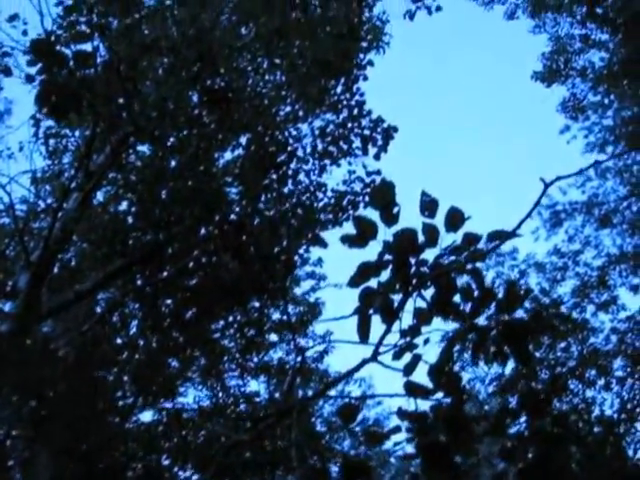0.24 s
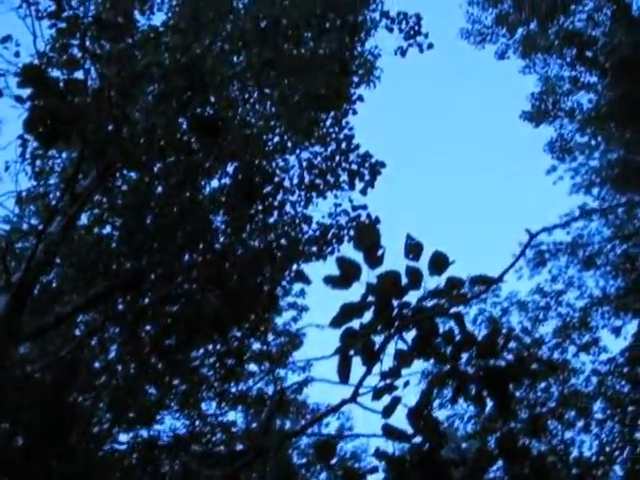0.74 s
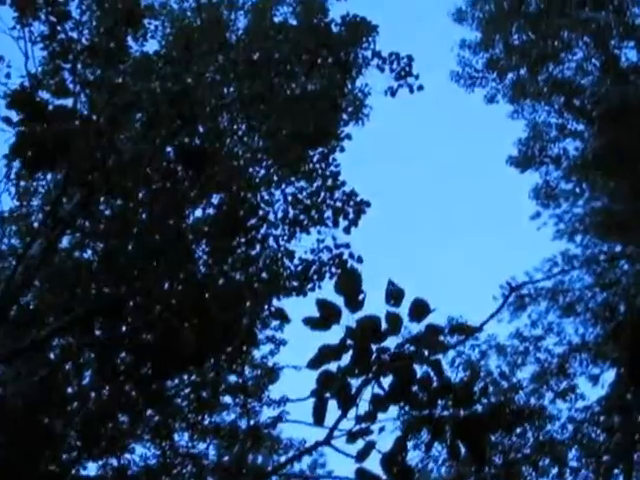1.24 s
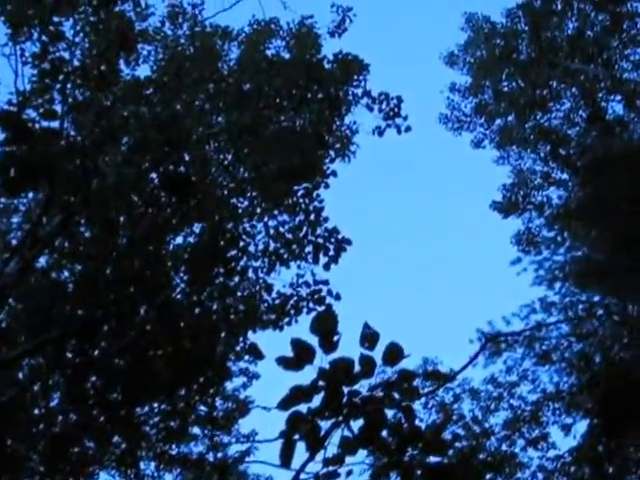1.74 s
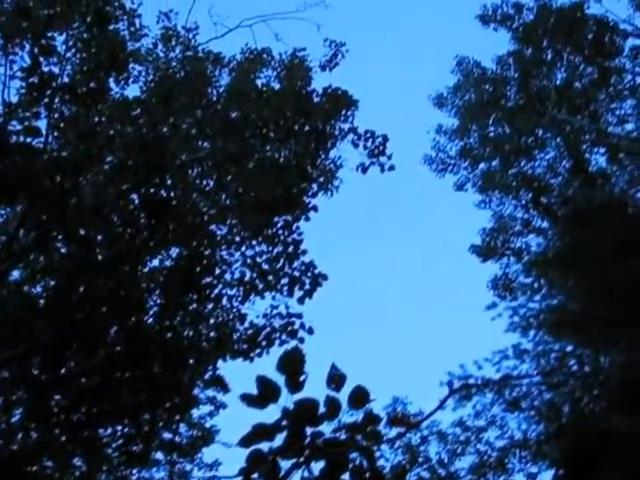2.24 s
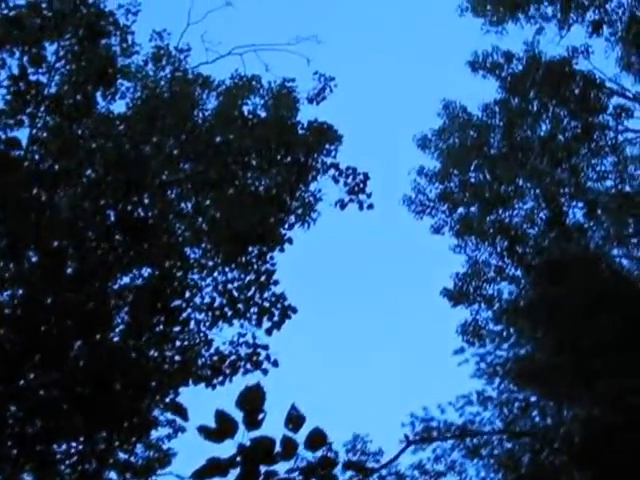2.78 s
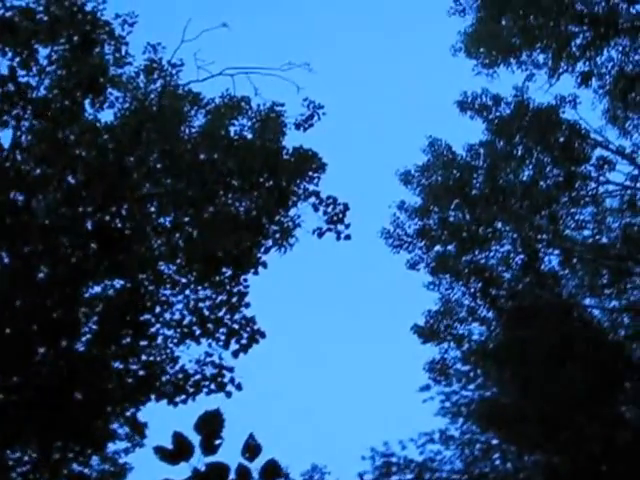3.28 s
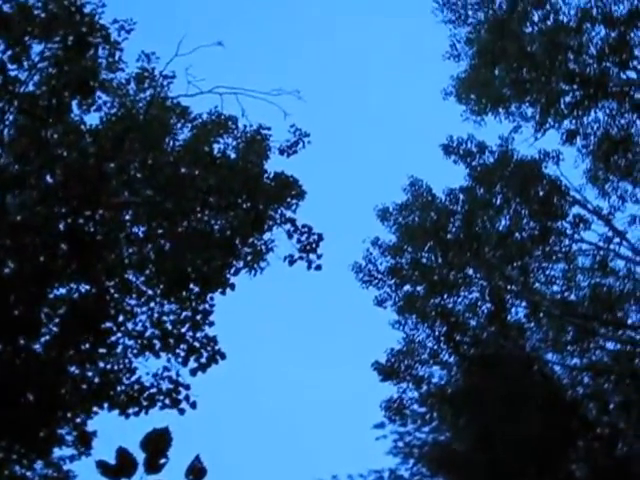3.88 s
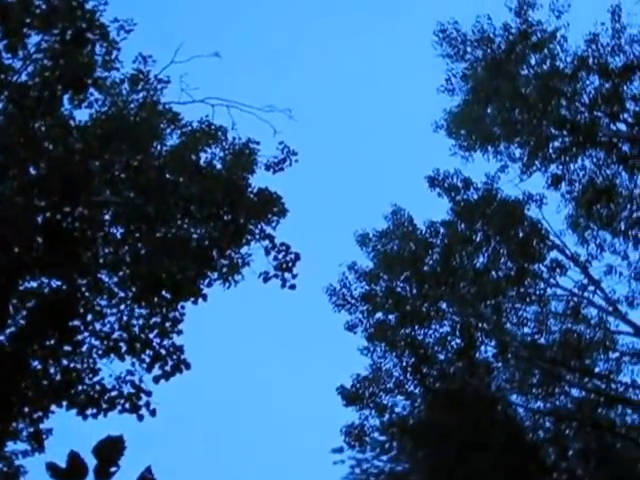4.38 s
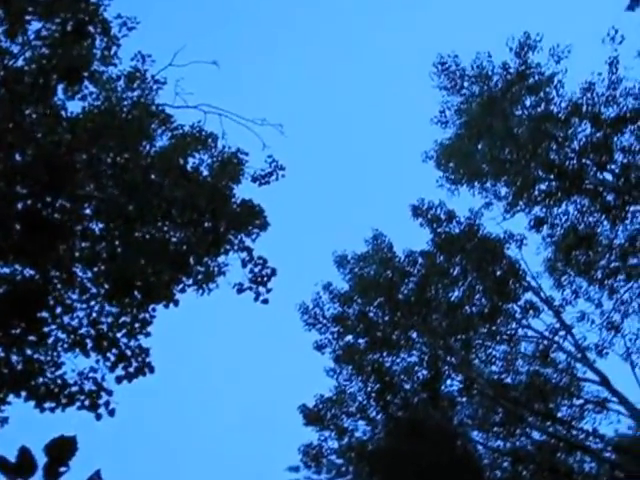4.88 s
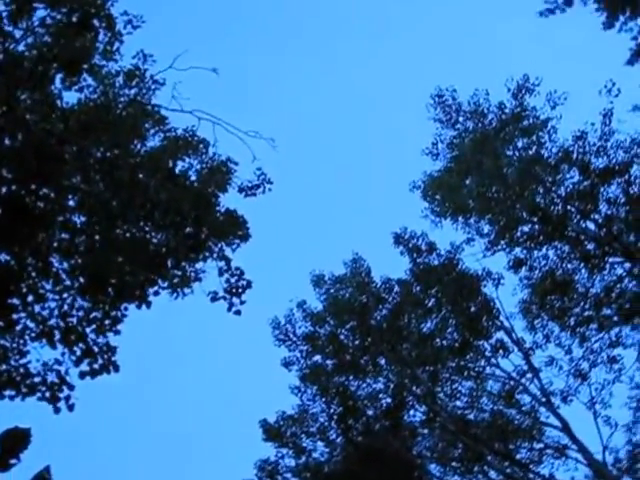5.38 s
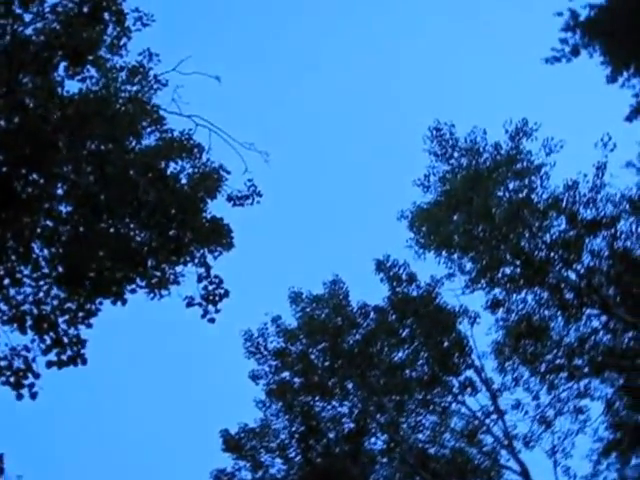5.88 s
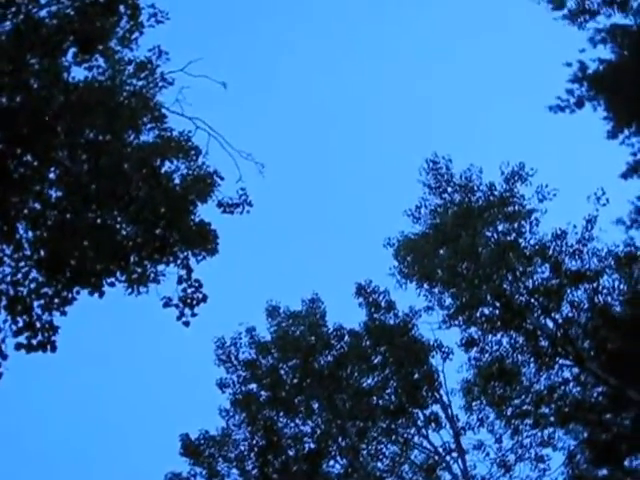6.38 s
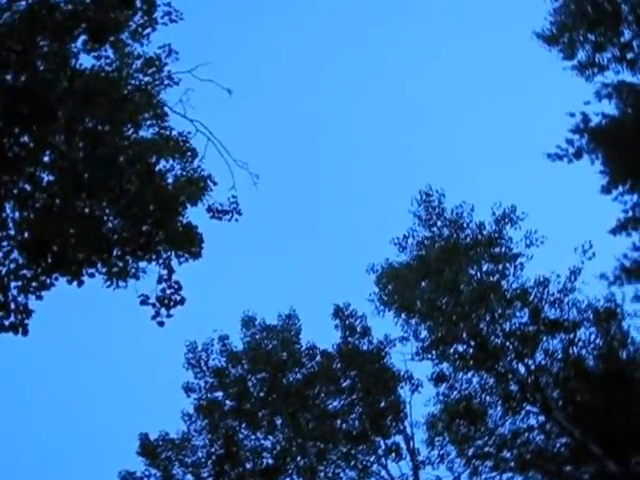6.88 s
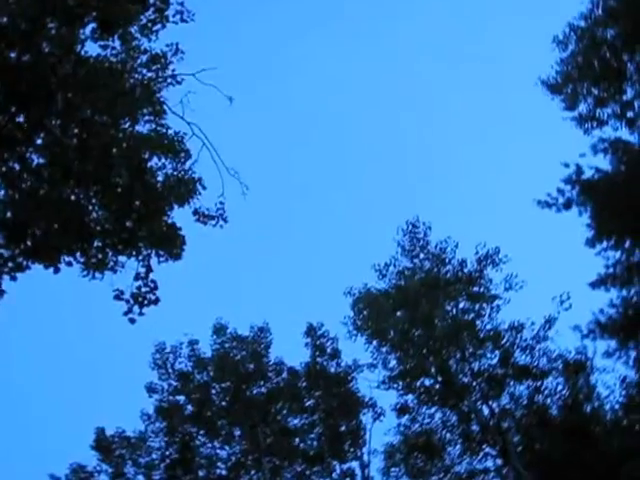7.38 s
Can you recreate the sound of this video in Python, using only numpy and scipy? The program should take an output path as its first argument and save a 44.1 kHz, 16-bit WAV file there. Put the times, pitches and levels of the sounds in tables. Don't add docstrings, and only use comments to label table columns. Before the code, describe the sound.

A forest at dawn, heard through a hand-held stereo microphone for about 7.6 seconds. Two flycatchers give split-second upward sweeps, each followed by a short buzz: the softer bird on the left at 0.1, 0.9, 1.7, 3.7, 4.5, 5.4 and 7.4, the nearer, louder one at 0.4, 1.2, 2.1, 2.7, 3.3, 4.4, 5.0, 6.3 and 6.9. From 0.4 to 3.5 a sparrow holds thin wavering whistles, high, then middle, then low. Short warbler slurs cluster around 4, 5, 6.1 and 7.1. Tree trunks spread everything into a bright echoing haze of far chorus. Low wind thumps shift between sides, with heavier gusts near 4.6, 5.8 and 7. Fingers rustle around 1.6 and 6.5; small ticks fall at 0.2, 0.5, 3.4 and 6.6, and faint motor steps patter ten per second from 1.8 to 2.8, over soft hiss and faint whine.

```python
import sys
import numpy as np
from scipy import signal
from scipy.fft import rfft, irfft
from scipy.io import wavfile
from scipy.ndimage import uniform_filter1d, map_coordinates

SR = 44100
rng = np.random.default_rng(int(sys.argv[2]) if len(sys.argv) > 2 else 0)


def convert_level_to_amplitude(level_db):
    exponent = np.asarray(level_db, float) / 20
    return 10 ** exponent


def wav_out(sig):
    wavfile.write(sys.argv[1], SR, np.round(np.clip(np.atleast_2d(sig).T, -1, 1) * 32767).astype(np.int16))


N = 336483
TIME = np.arange(N) / SR


def coloured(table, count=2):
    hz, db = np.transpose(table)
    f = np.maximum(np.fft.rfftfreq(N, 1 / SR), 1)
    gain = convert_level_to_amplitude(np.interp(np.log(f), np.log(hz), db))
    x = irfft(rfft(rng.standard_normal((count, N))) * gain, N)
    return x / np.std(x)


def narrow(hz, width_hz):
    x = signal.lfilter(*signal.iirpeak(hz, hz / width_hz, SR), rng.standard_normal(N))
    return x / np.std(x)


def walk(rate_hz):
    k = int(SR / rate_hz)
    return 1.37 * uniform_filter1d(np.repeat(rng.standard_normal(N // k + 1), k), k)[:N]


def bumps(times, sizes, width_s):
    return sum(size * np.exp(-.5 * ((TIME - at) / width_s) ** 2) for at, size in zip(times, sizes))


def add(track, start_s, sound):
    i = max(int(start_s * SR), 0)
    track[..., i:i + sound.shape[-1]] += sound[..., :N - i]


def sides(pan_db):
    return convert_level_to_amplitude(np.array([pan_db, -pan_db]) / 2).reshape(2, -1)


def whistle(hz, octave_db=-40):
    phase = 2 * np.pi * np.cumsum(hz) / SR
    third = .6 * (hz < 6200) * np.sin(3 * phase)
    return np.sqrt(2) * (np.sin(phase) + convert_level_to_amplitude(octave_db) * (np.sin(2 * phase) + third))


def slur(pitch):
    t = np.arange(pitch[0][0], pitch[-1][0], 1 / SR)
    hz = uniform_filter1d(np.interp(t, *np.transpose(pitch)), size=200, mode="nearest")
    return whistle(hz) * signal.windows.tukey(len(t), .35)


# pitch_hz, time_to_fall_60_db_s
TRUNK_RINGING = [(2200, 1.4), (3100, 1.23), (4400, 1.26), (6200, 0.89), (8800, 0.48), (12400, 0.47)]


def trunks(x, db, clump_db, early_db):
    t = TIME[:int(1.6 * SR)]
    echo = 0
    for hz, t60 in TRUNK_RINGING:
        band = signal.butter(2, [hz / 2 ** .25, hz * 2 ** .25], "bandpass", fs=SR, output="sos")
        echo = echo + signal.sosfilt(band, rng.standard_normal((2, len(t)))) * convert_level_to_amplitude(-60 * t / t60)
    clumps_db = clump_db * walk(500)[:len(t)] * np.exp(-t / 0.014)
    nearest_db = early_db * np.exp(-t / 0.089)
    build = (1 - np.exp(-t / .005)) ** 2
    echo = echo * convert_level_to_amplitude(clumps_db + nearest_db) * build * convert_level_to_amplitude(db) / np.sqrt(0.014 * SR)
    return signal.fftconvolve(np.atleast_2d(x), echo, axes=1)[:, :N]


# time_s, level_db, left_minus_right_db
BREEZE = [(0, -68, -16), (.33, -67.5, -26), (.8, -58.5, -12), (1.5, -52, -5), (2.3, -54.5, -5),
          (2.85, -49.5, -0.5), (3.4, -54.5, -4), (3.7, -62, 38), (4.0, -50, 27), (4.5, -56, 23),
          (5.3, -47.5, 17), (5.95, -49.5, 31), (6.3, -56.5, 1), (6.6, -62, 13), (6.85, -54.5, -33),
          (7.2, -55.5, -12), (7.63, -55, -7)]
# time_s, gain_db
GUSTS = [(.15, 9), (.58, 11.5), (1.24, 5.5), (3.62, 8), (4.06, 5), (4.62, 11), (4.99, 3.5), (5.09, 3),
         (5.45, 7), (5.72, 14), (5.87, 15.5), (6.04, 9), (6.17, 5.5), (6.991, 14.5), (7.16, 8.5)]
# pitch_hz, level_db (per Hz)
THUMP_TONE = [(12, -50), (22, -12), (50, 1.5), (75, 4), (115, -0.5), (170, -11), (260, -22), (400, -45),
              (800, -53)]
# pitch_hz, level_db (per Hz)
FLUTTER_TONE = [(40, -12), (100, 4), (150, 0.5), (250, -14), (400, -22), (800, -53)]


def wind():
    s, db, pan_db = np.transpose(BREEZE)
    pan_db = np.interp(TIME, s, pan_db)
    louder_db = 20 * np.log10(2 / np.hypot(*sides(pan_db)))
    force_db = np.interp(TIME, s, db) + np.array([walk(11), walk(12)])
    force_db = force_db + bumps(*np.transpose(GUSTS), width_s=0.039)
    flutter_db = 0.5 * (force_db + 44.5) - 8.5 + 3.0 * walk(25)
    eddies = coloured(THUMP_TONE) + coloured(FLUTTER_TONE) * convert_level_to_amplitude(flutter_db)
    return eddies * sides(pan_db) * convert_level_to_amplitude(force_db + louder_db - 2.5)


# pitch_hz, level_db (per Hz)
AIR_TONE = [(30, -15), (80, -18.5), (160, -39), (280, -21.5), (575, -25.5), (810, -23.5), (1000, -61),
            (1300, -25), (1700, -20), (2600, -18.5), (5000, -63), (7500, -26.5), (12500, -34.5),
            (15500, -59)]
# pitch_hz, likeness (0 to 1)
AIR_LIKENESS = [(130, 0.8), (290, 1), (640, 0.97), (1400, 0.85), (2600, 0.3), (4000, 0)]


def air():
    left, other = rfft(coloured(AIR_TONE))
    hz, share = np.transpose(AIR_LIKENESS)
    like = np.interp(np.log(np.fft.rfftfreq(N, 1 / SR) + 1), np.log(hz), share)
    like = np.clip(like, 0, 1)
    right = like * left + np.sqrt(1 - like ** 2) * other
    return irfft(np.array([left, right]), N) * convert_level_to_amplitude(-56 + .4 * walk(1.5) + .6 * walk(9))


# time_s, rustle_db
GRIP = [
    (0, -59),
    (.85, -58),
    (1.59, -52),
    (1.9, -55.5),
    (2.27, -55),
    (3.1, -58),
    (6.1, -58),
    (6.52, -53.5),
    (7.0, -60),
    (7.63, -59.5),
]
# pitch_hz, level_db (per Hz)
RUSTLE_TONE = [(250, -10.5), (400, -1), (550, -1.5), (800, -1), (1200, 2), (1700, -5), (2500, -17.5)]
# pitch_hz, width_hz, level_db
WHINES = [
    (799, 51, -67),
    (7280, 10, -75.5),
]


def handling():
    shared, own = coloured(RUSTLE_TONE)
    rustle_db = np.interp(TIME, *np.transpose(GRIP)) - 3.0 + 1.16 * walk(12)
    out = (shared + 0.64 * own * np.array([[1], [-1]])) * convert_level_to_amplitude(rustle_db)
    drone_fade_db = -28 * np.clip(TIME - 2.56, 0, .5)
    out = out + narrow(255, 62) * convert_level_to_amplitude(-68.5 + drone_fade_db + 1.2 * walk(3))
    out += sum(convert_level_to_amplitude(db) * narrow(hz, width_hz) for hz, width_hz, db in WHINES)
    add(out, .06, convert_level_to_amplitude(-62.0) * slur([(.06, 474), (.26, 464)]))
    return out


def patches(x):
    f, t, z = signal.stft(x, SR, nperseg=1024)
    coarse = rng.standard_normal((len(f) // 12 + 2, len(t) // 12 + 2))
    points = np.meshgrid(np.arange(len(f)) / 12, np.arange(len(t)) / 12, indexing="ij")
    level_db = 2.66 * map_coordinates(coarse, points, order=1)
    return signal.istft(z * convert_level_to_amplitude(level_db), SR, nperseg=1024)[1][:, :N]


# time_s, level_db
CHORUS_SWELL = [(0.0, -50), (0.47, -53.5), (0.57, -47.5), (1.8, -53), (2.02, -46.5), (2.35, -49.5),
                (2.6, -55.5), (2.8, -44.5), (3.06, -48), (3.72, -49), (4.1, -45.5), (4.45, -49),
                (4.86, -48.5), (5.1, -47.5), (5.52, -52.5), (6.06, -50), (6.2, -47), (6.44, -53),
                (6.84, -53), (7.03, -53.5), (7.63, -48.5)]


def far_chorus(count=650):
    out = np.zeros(N)
    for when, height, up, length, size in rng.random((count, 5)):
        hz = 2350 + 3250 * height ** 1.2
        reach = (1.5 + 0.3086 * size) ** np.sign(up - .5)
        note = slur([(0, hz / reach ** .5), (.02 + .05 * length, hz * reach ** .5)])
        add(out, when * N / SR, note * convert_level_to_amplitude(-6 * size - 4.2 * height))
    wet = patches(trunks(out, 0, 2.5, 0))
    wet[:, :SR] += wet[:, -SR:] * convert_level_to_amplitude(-30 * TIME[:SR])
    return wet / np.std(wet) * convert_level_to_amplitude(np.interp(TIME, *np.transpose(CHORUS_SWELL)) + 3.5)


# delay_s, level_db
TWIGS = [(.0021, -13), (.0037, -11), (.0054, -11), (.0072, -11), (.0093, -13), (.0121, -15)]


def twigs(x):
    ports = []
    for port in range(2):
        ports.append(sum(convert_level_to_amplitude(db) * walk(3) * np.roll(x, int(s * SR) + 9 * port) for s, db in TWIGS))
    return np.array(ports)


# time_from_middle_s, share_of_top_pitch
SWEEP_RISE = [(-.011, .46), (-.005, .575), (0, .72), (.006, .88), (.01, .95), (.014, .985), (.018, 1)]
SWELL_S = [-.0095, -.007, -.003, .004, .01, .012, .016, .018]
SWELL_DB = [-36, -13, -5, 0, 2.5, -4, -10, -30]


def flycatcher(calls, trill_scale, shade_db_s, entry_shade_db, octave_db, hold_db):
    sweeps, buzzes = np.zeros(N), np.zeros(N)
    s, share = np.transpose(SWEEP_RISE)
    for at, top_hz, db, wait, buzz_db in calls:
        t = np.arange(s[0], s[-1], 1 / SR)
        hz = uniform_filter1d(top_hz * np.interp(t, s, share), size=90, mode="nearest")
        swell_db = np.interp(t, SWELL_S, SWELL_DB) + shade_db_s * np.minimum(t - .002, 0)
        top_db = hold_db * np.clip((t - .009) / .004, 0, 1)
        add(sweeps, at + s[0], whistle(hz, octave_db) * convert_level_to_amplitude(db + top_db + swell_db))

        rate_hz = 123 * (1 + .02 * rng.standard_normal())
        t = np.arange(-.012, 3.2 / rate_hz, 1 / SR)
        crest = (.5 + .5 * np.cos(2 * np.pi * rate_hz * t)) ** 1.5
        early_crest = np.clip((top_hz - 6750) / 500, 0, .5)
        crest = crest * np.where(t > -.5 / rate_hz, 1, early_crest) * (t > -1.5 / rate_hz)
        base_hz = np.interp(t, [-.012, -.007, -.002], [2500, 3290, 3500])
        hz = base_hz + 2350 * crest * (.85 + 8 * t)
        flank = 4 * crest * (1 - crest)
        swell_s = [t[0], -.008, -.004, t[-1] - .004, t[-1] - .001, t[-1]]
        swell_db = np.interp(t, swell_s, [-16 - entry_shade_db, -3 - entry_shade_db, 0, 0, -3, -15])
        rough_db = 1.5 * crest + 7.0 * flank + 2.5 * walk(400)[:len(t)] - 2.8
        buzz = whistle(trill_scale * hz, -21) * convert_level_to_amplitude(db + buzz_db + swell_db + rough_db)
        add(buzzes, at + wait + t[0], buzz)
    return sweeps, buzzes


# start_s, top_hz, sweep_db, wait_for_buzz_s, buzz_minus_sweep_db
LEFT_CALLS = [
    (0.0686, 6690, -32, .069, -4),
    (0.8705, 6690, -31.5, .069, -11),
    (1.6548, 6670, -31.5, .069, -11.5),
    (3.7227, 6580, -30.5, .069, -13.5),
    (4.519, 6660, -31.5, .069, -14),
    (5.3957, 6620, -31, .069, -13.5),
    (7.4213, 6630, -36, .069, -10),
]


def left_flycatcher():
    sweep, buzz = flycatcher(LEFT_CALLS, 1.0, 3000, 14, -36, 6)
    bird = sweep + buzz
    direct = np.array([bird, convert_level_to_amplitude(-5.5) * np.roll(bird, 11)])
    return direct + twigs(convert_level_to_amplitude(-7) * bird) + trunks(bird, -9.5, 2.5, 1.2) * sides(2.7)


# start_s, top_hz, sweep_db, wait_for_buzz_s, buzz_minus_sweep_db
NEAR_CALLS = [
    (0.4186, 7020, -28, .0748, -9),
    (1.2371, 6830, -28, .072, -7),
    (2.0812, 6910, -29, .0704, -6),
    (2.6796, 7050, -28.5, .0728, -6),
    (3.3348, 6940, -28, .0732, -8),
    (4.3606, 6850, -28, .0736, -7),
    (4.9742, 7020, -28, .0732, -6.5),
    (6.2611, 6810, -27.5, .0716, -6.5),
    (6.8727, 7010, -28, .0748, -6.5),
]
FACING_DB = [0.71, 0.33, 0.33, 0.33, 1.1, 1.9, 1.4, 2.5, 4]


def near_flycatcher():
    sweep, buzz = flycatcher(NEAR_CALLS, 1.01, 50, 0, -28, 0)
    facing = convert_level_to_amplitude(np.interp(TIME, np.transpose(NEAR_CALLS)[0], FACING_DB))
    bird = sweep + buzz
    direct = np.array([np.roll(bird, 2), bird]) * facing
    return direct + twigs(bird * facing) + trunks(sweep + convert_level_to_amplitude(1) * buzz, -13.0, 2.5, 11.6)


def ring(hz, t60):
    t = TIME[:int(t60 * SR)]
    return np.sin(2 * np.pi * hz * t) * convert_level_to_amplitude(-60 * t / t60)


MOTOR_STEPS = [-45.5, -47, -47.5, -49.5, -49, -46.5, -47.5, -46.5, -47.5, -47.5, -48.5]
# pitch_hz, level_db, time_to_fall_60_db_s
STEP_TONES = [(725, 7, 0.063), (965, 1.5, 0.09), (1162, 6.5, 0.085)]
# time_s, level_db, pitch_hz, time_to_fall_60_db_s, left_minus_right_db
TICKS = [
    (0.1887, -24.5, 2130, 0.013, 6),
    (0.458, -34, 1230, 0.0046, 13),
    (3.3585, -38.5, 866, 0.089, 5),
    (3.366, -34.5, 1210, 0.026, 7),
    (6.608, -31, 940, 0.0043, 1),
    (7.115, -48, 1450, 0.023, 0),
]


def camera():
    out = np.zeros((2, N))
    for at, db in zip(1.795 + .1 * np.arange(len(MOTOR_STEPS)), MOTOR_STEPS):
        for hz, tone_db, t60 in STEP_TONES:
            detune, late, size = rng.random(3)
            tone = ring(hz * (0.99 + 0.117 * detune), t60)
            add(out, at + 0.00797 * late, convert_level_to_amplitude(db + tone_db - 6.5 - 3.4 * size) * tone)
        add(out, at, convert_level_to_amplitude(db - 4) * ring(362.0, 0.12))
    for at, db, hz, t60, pan_db in TICKS:
        add(out, at, convert_level_to_amplitude(db) * sides(pan_db) * ring(hz, t60))
        add(out, at, convert_level_to_amplitude(db - 41) * rng.standard_normal(88) * convert_level_to_amplitude(-.4 * np.arange(88)))
    return out


# start_s, length_s, level_db, from_hz, to_hz
WHISTLES = [
    (0.388, 0.68, -44, 4118, 4058),
    (1.199, 0.59, -46, 3748, 3795),
    (1.76, 0.6, -47, 3012, 3034),
    (2.35, 0.35, -46.5, 3026, 3033),
    (2.64, .12, -46, 3060, 3135),
    (2.755, 0.31, -47.5, 3080, 3020),
    (3.03, 0.26, -45, 3062, 3094),
    (3.26, 0.22, -50, 3085, 3070),
]
# time_s, gain_db, left_minus_right_db
LEAF_GAPS = [(.45, -6, 2), (.53, 2, 0), (.585, -10, 3), (.62, 7, 4), (.68, -12, -14), (.73, -10, -9),
             (.77, 0, -15), (.8, -5, -2), (.828, 7.5, 11), (.862, 3.5, 0), (.885, -6, 4), (.915, 3, 1),
             (.96, -5, 9), (1.01, -5, -5), (1.2, 2, 5), (1.26, 0, 2), (1.315, 2, -2), (1.36, -13, -3),
             (1.39, 9.5, 8), (1.415, -8, 0), (1.45, 11.5, 0), (1.468, -7, 2), (1.485, 6, 12),
             (1.51, -15, 1), (1.55, 6.5, 7), (1.573, -11, 0), (1.595, 11, 14), (1.615, -9.5, 0),
             (1.65, -1, -8), (1.69, -3, -5), (1.73, 1, 2), (1.81, -3.5, -4), (1.89, 4, -6), (1.96, 0, -4),
             (2.0, 1, -5), (2.05, -5, -10), (2.11, -2, 5), (2.16, 3, -5), (2.24, -3, -10), (2.3, -10, 2),
             (2.4, -6, 2), (2.445, -3.5, -14), (2.49, -8, -10), (2.53, -2, -10), (2.585, 2.5, -13),
             (2.64, 1, -7), (2.83, -5, 3), (2.93, -3, -6), (2.98, 0.5, -14), (3.04, 0.5, -10), (3.1, -3, 2),
             (3.16, -0.5, 5), (3.2, 7.5, 0), (3.24, -2, -5), (3.3, -13, 2)]


def sparrow():
    voice = np.zeros(N)
    for at, length, db, from_hz, to_hz in WHISTLES:
        t = np.arange(0, length, 1 / SR)
        waver_hz = 9 if from_hz < 3500 else 5
        hz = from_hz + (to_hz - from_hz) * t / length + waver_hz * walk(30)[:len(t)]
        fade = np.clip(np.minimum(t, length - t) / .05, 0, 1)
        add(voice, at, whistle(hz) * convert_level_to_amplitude(db) * fade)
    s, gain_db, pan_db = np.transpose(LEAF_GAPS)
    stray = np.array([walk(30) + 1j * walk(30) for _ in range(2)])
    paths = (1 + .15 * stray) * sides(bumps(s, pan_db, .017))
    song = np.real(signal.hilbert(voice * convert_level_to_amplitude(bumps(s, gain_db, .017))) * paths)
    shaking = walk(60) + np.array([[.4], [-.4]]) * walk(60)
    flutter = 1 + .42 * np.clip(2 * TIME - 1.6, .2, 1) * shaking
    return song * flutter + trunks(voice, -14.5, 2, 2.0)


def warbler_notes(notes, turns):
    out = np.zeros(N)
    for at, length, db, end_hz, far_hz in notes:
        path = [(0, end_hz), (length, far_hz)]
        if turns:
            share = np.arange(9) / 8
            path = [(u * length, end_hz + (far_hz - end_hz) * np.sin(np.pi * u) ** 1.5) for u in share]
        add(out, at, convert_level_to_amplitude(db) * slur(path))
    return out


# start_s, length_s, level_db, from_hz, to_hz
SLIDES = [(1.13, 0.07, -57, 3520, 3750), (2.28, 0.13, -56, 3700, 3620), (2.86, 0.078, -53, 3730, 3590),
          (2.965, 0.035, -46, 4300, 4230), (3.19, 0.03, -53, 2466, 2430), (3.72, .05, -58, 2900, 3050),
          (3.835, .016, -52, 2750, 2550), (3.968, 0.044, -53, 3400, 2380), (4.02, 0.018, -51, 2410, 2400),
          (4.09, 0.027, -47, 2937, 2600), (4.14, 0.054, -46.5, 2900, 2330), (4.2, 0.1, -59, 3850, 3840),
          (4.94, .025, -52, 3150, 3000), (4.962, 0.026, -49, 2950, 2380), (4.995, 0.033, -48, 2800, 2260),
          (5.08, 0.1, -51, 3250, 2880), (5.185, 0.055, -47, 2885, 2865), (5.24, .06, -52, 2865, 2855),
          (5.32, 0.044, -64, 2870, 2860), (5.97, 0.029, -55, 2110, 2120), (5.975, 0.064, -56, 4850, 4720),
          (6.01, 0.035, -54, 2960, 2920), (6.055, 0.036, -49, 2850, 3120), (6.1, 0.023, -52, 2880, 2920),
          (6.133, 0.03, -46, 3420, 2880), (6.165, 0.021, -45.5, 2900, 2370), (6.182, .012, -50, 2750, 2950),
          (6.205, .015, -52, 2900, 3250), (6.83, 0.045, -55.5, 2420, 2280),
          (6.88, 0.034, -43.5, 3530, 2960)]
# start_s, length_s, level_db, ends_hz, turn_hz
DIPS = [
    (2.17, 0.047, -53, 2920, 2576),
    (4.865, 0.041, -58, 3400, 2470),
    (6.035, 0.048, -49, 2950, 2280),
    (6.11, 0.058, -53.5, 4170, 3790),
    (6.77, 0.18, -50, 2920, 4180),
    (7.078, 0.049, -46, 3383, 2440),
    (7.125, 0.052, -43, 3428, 2398),
]
# start_s, length_s, level_db, from_hz, to_hz
HIDDEN_NOTES = [(.435, 0.041, -53, 3100, 2443), (1.24, 0.046, -48, 3100, 2434),
                (1.36, .05, -58, 3200, 2406), (1.555, 0.0099, -46.5, 5600, 7360),
                (2.3, 0.043, -47.5, 3200, 2495), (3.62, 0.14, -57, 5060, 5040),
                (3.93, .035, -52, 4290, 3580), (3.975, .06, -50, 4750, 5000), (5.89, 0.05, -59, 5290, 4770),
                (6.205, 0.015, -52, 5140, 7300), (7.175, 0.034, -48, 3010, 3690),
                (7.612, .018, -41, 5060, 6600)]


def warblers():
    slurs = warbler_notes(SLIDES, False) + warbler_notes(DIPS, True)
    waver = convert_level_to_amplitude(3.0 * np.array([walk(90), walk(90)]) - 1.0)
    hidden = warbler_notes(HIDDEN_NOTES, False)
    return slurs * waver + trunks(convert_level_to_amplitude(-4.5) * slurs + hidden, -4, 2.5, 6)


def scene():
    hush = air() + handling()
    hush = np.array([hush[0], np.roll(hush[1], 6)])
    around = wind() + hush + far_chorus() + camera()
    birds = left_flycatcher() + near_flycatcher() + sparrow() + warblers()
    return birds + around


def low_pass(x):
    return signal.sosfilt(signal.butter(12, 15660, fs=SR, output="sos"), x)


def record(dry):
    return low_pass(dry)


dry = scene()
out = record(dry)
wav_out(out)
```